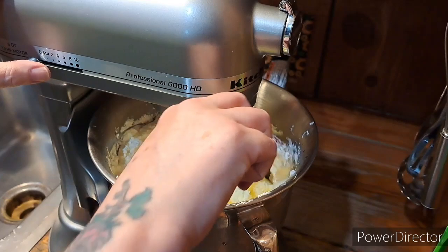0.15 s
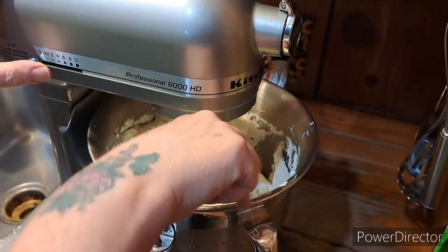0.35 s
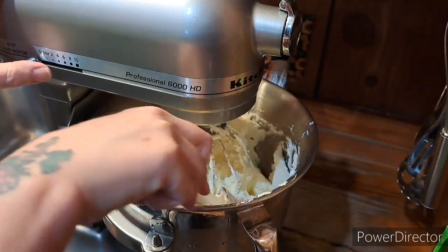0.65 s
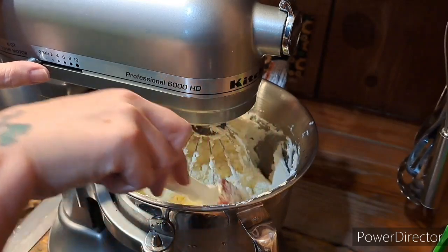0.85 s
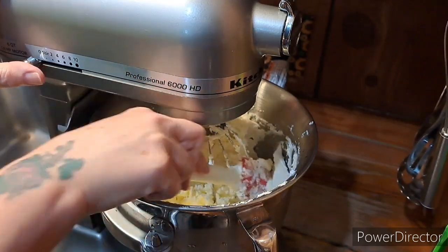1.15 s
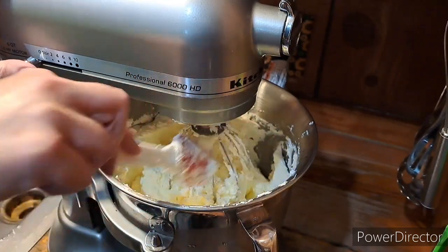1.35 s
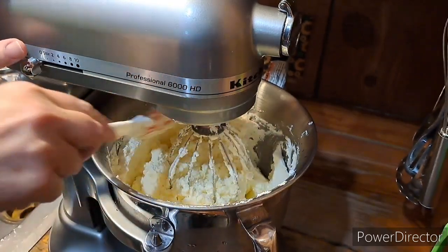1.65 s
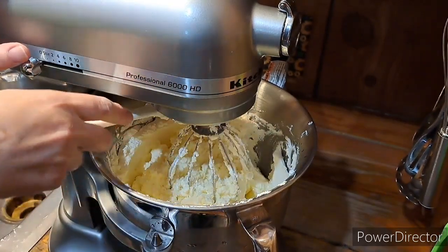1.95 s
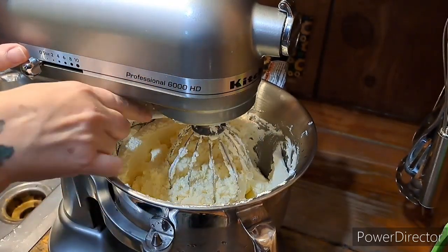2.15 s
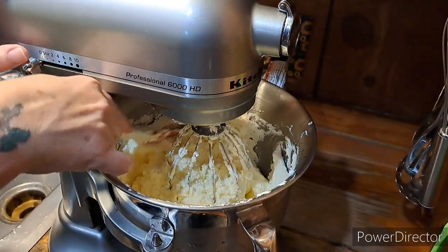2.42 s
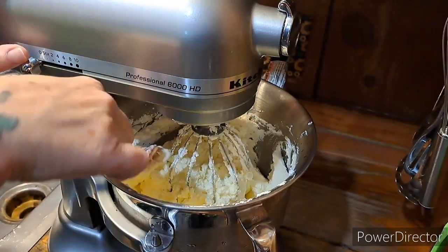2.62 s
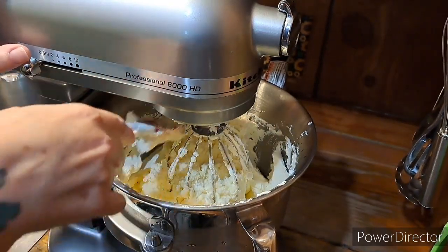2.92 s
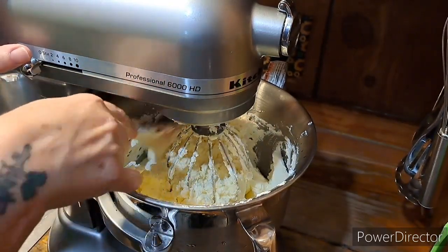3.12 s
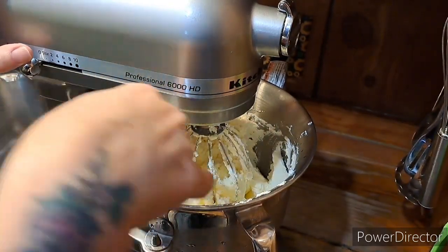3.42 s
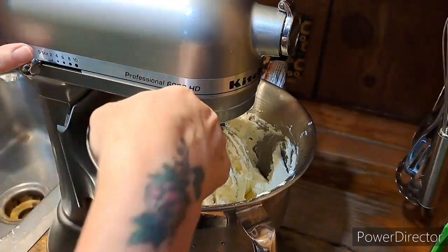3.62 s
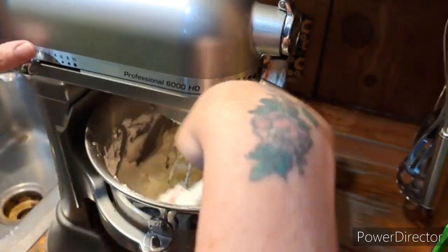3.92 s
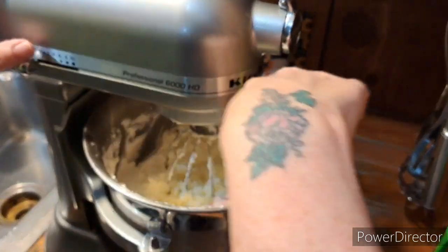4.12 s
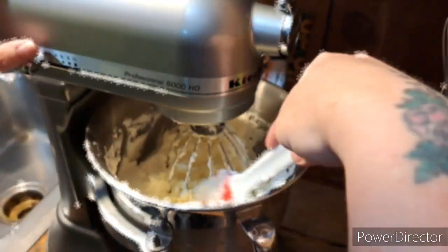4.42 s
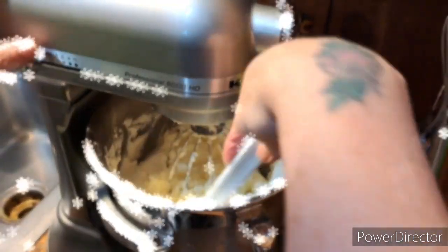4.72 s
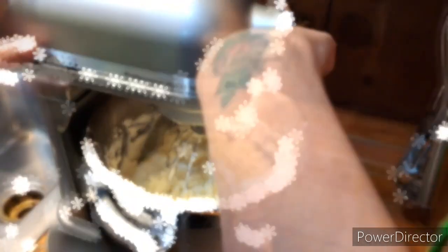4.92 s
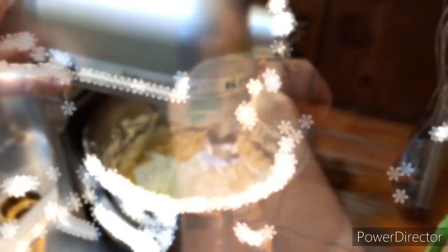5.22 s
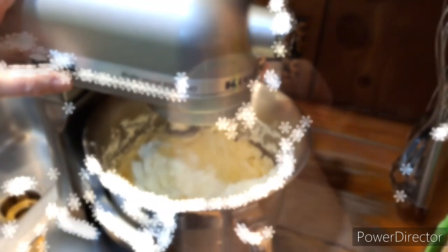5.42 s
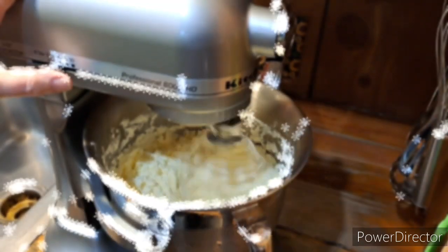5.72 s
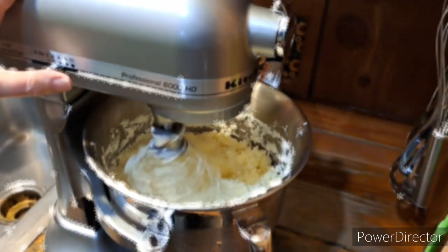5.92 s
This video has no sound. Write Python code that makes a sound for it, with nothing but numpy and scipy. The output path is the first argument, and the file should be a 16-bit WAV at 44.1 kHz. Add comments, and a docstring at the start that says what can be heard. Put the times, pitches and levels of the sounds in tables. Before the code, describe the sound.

Wet scraping and hollow metallic knocks in a mixing bowl, fading to a brief silence before a whining mixer motor rises.

```python
"""A kitchen: a soft spatula scrapes batter down a steel bowl and knocks its wall while appliances hum.
Strokes are shaped noise (wet fizz, rasp, bowl murmur) with a gliding squeak; knocks ring damped bowl
modes, and wet ticks are brief puffs of noise. The sound drops out for a moment, then air and strokes fade.
After a short silence a running stand mixer fades in: hum, drive resonances, whirr, thrum and gear whine."""
import sys
import numpy as np
from scipy import signal
from scipy.fft import rfft, irfft, next_fast_len
from scipy.io import wavfile
from scipy.ndimage import map_coordinates

SR = 44100
rng = np.random.default_rng(int(sys.argv[2]) if len(sys.argv) > 2 else 0)


def store_pcm(level_fs):
    """Save levels as 16-bit WAV."""
    pcm = np.round(np.clip(level_fs, -1, 1) * 32767).astype(np.int16)
    wavfile.write(sys.argv[1], SR, np.atleast_2d(pcm).T)


N = 267638


def amp(db):
    """Decibel law: amplitude gain of a level in dB."""
    return 10 ** (np.asarray(db) / 20)


def unit(x):
    """Normalisation: x scaled to rms 1."""
    return x / np.sqrt(np.mean(x ** 2) + 1e-20)


def along(points, hz):
    """Interpolation of (pitch, value) points on a logarithmic frequency axis."""
    f, v = np.transpose(points)
    return np.interp(np.log(hz + 1), np.log(f + 1), v)


def curves(rows):
    """Linear interpolation in time: one value per sample for each column after the time."""
    s, *cols = np.transpose(rows)
    return [np.interp(np.arange(N) / SR, s, c) for c in cols]


def wobble(rate):
    """Random modulation: a smooth curve through normal random knots, rate knots a second."""
    knots = rng.standard_normal(int(N * rate / SR) + 4)
    return map_coordinates(knots, [np.arange(N) * rate / SR])


def filtered(x, response):
    """Linear filtering: the spectrum of x times a response of frequency."""
    m = next_fast_len(N + SR // 2)
    return irfft(rfft(x, m) * response(np.fft.rfftfreq(m, 1 / SR)), m)[..., :N]


def spread(pair, gain, alike, lean):
    """Interchannel coherence: two unrelated signals coloured and mixed to a likeness and lean."""
    def mix(hz):
        turn = np.arccos(np.clip(along(alike, hz), -1, 1)) / 2
        return gain(hz) * [np.cos(turn), np.sin(turn)]

    mid, side = filtered(pair, mix)
    left_right = np.array([mid + side, mid - side]) / np.sqrt(np.mean(mid ** 2))
    return filtered(left_right, lambda hz: amp(np.outer([.5, -.5], along(lean, hz))))


def rush(spectrum, alike, lean, grain_db=0):
    """Coloured stereo noise: grain_db modulates its level into fast spits."""
    pair = rng.standard_normal((2, N)) * amp(grain_db * wobble(400))
    return spread(pair, lambda hz: amp(along(spectrum, hz)), alike, lean)


def tones(lines, lean, waver_db, drift):
    """Line spectrum: steady sines whose level (dB) and phase (radians) wander a little."""
    t, sides = np.arange(N) / SR, np.array([[.5], [-.5]])
    total = 0
    for hz, db in lines:
        gain = amp(db + waver_db * wobble(5) + sides * along(lean, hz)) * np.sqrt(2)
        total = total + gain * np.sin(2 * np.pi * hz * t + drift * wobble(2.88))
    return total


def dying(x, decays):
    """Frequency-dependent damping: each band dies at its own t60 from (pitch_hz, t60_s)."""
    hz, t, z = signal.stft(x, SR, nperseg=128)
    decay = amp(-60 * t / along(decays, hz)[:, None])
    return signal.istft(z * decay, SR, nperseg=128)[1][..., :x.shape[-1]]


# appliance tones: pitch_hz, level_db
HUM_TONES = [(58.3, -50.5), (95.5, -51.5), (143, -63.5), (214, -70.5), (285, -71.5)]
# spectrum of kitchen air and microphone hiss: pitch_hz, relative density_db
AIR_SPECTRUM = [(15, -50.5), (25, -26.5), (48, -4), (96, -3.5), (174, -13.5), (216, -14.5), (241, -20),
                (283, -13), (402, -20.5), (540, -17), (1090, -31), (1350, -32), (4080, -47.5), (12000, -50),
                (15700, -58)]
# left-right likeness of the air: pitch_hz, coherence (0-1)
AIR_COHERENCE = [(60, 0.92), (180, 0.99), (550, 0.98), (1650, 0.2), (5000, 0.21), (15000, .05)]
# stereo lean of the air and tones: pitch_hz, left minus right_db
AIR_BALANCE = [(55, -5), (100, -1.5), (180, -1), (550, 2), (1650, 0.5), (5000, -2), (15000, 2.5)]
AIR_DB, AIR_LAG_S = -51.5, 0.00035  # mean level; later arrival at the right channel


def air():
    """Tonal and broadband background: appliance tones over room noise with an interchannel delay."""
    noise = amp(AIR_DB + .6 * wobble(11)) * rush(AIR_SPECTRUM, AIR_COHERENCE, AIR_BALANCE)
    noise[1] = np.roll(noise[1], round(AIR_LAG_S * SR))
    return tones(HUM_TONES, AIR_BALANCE, waver_db=1.6, drift=0.65) + noise


# spatula strokes, the first being the blade resting in the batter:
# start_s, length_s, wet fizz_db, rasp on the steel_db, bowl murmur_db
STROKES = [(0.0, 4.9, -80, -83, -70.5), (0.0, 0.037, -77.5, -87, -82), (0.35, 0.05, -66, -74.5, -60),
           (0.395, 0.074, -64.5, -60.5, -68.5), (0.466, 0.028, -65.5, -55.5, -74),
           (0.528, 0.035, -64.5, -62.5, -72.5), (0.74, 0.017, -71, -73.5, -70),
           (0.89, 0.12, -70.5, -73, -70), (1.297, .03, -70, -75, -77), (2.369, .008, -63, -65, -65),
           (2.394, 0.016, -63, -62, -66), (2.488, 0.029, -61.5, -61, -59), (2.536, .05, -64.5, -57.5, -63),
           (2.6, 0.081, -62.5, -54.5, -64.5), (2.712, 0.023, -64, -65, -68), (2.758, .08, -62.5, -65, -70),
           (2.927, .03, -69.5, -73.5, -69), (3.207, 0.055, -70, -67.5, -63.5),
           (3.26, 0.035, -64, -62.5, -66), (3.326, 0.044, -65, -53.5, -68), (3.413, 0.061, -65, -62, -65.5),
           (3.702, .04, -72, -72, -61), (3.743, 0.061, -65, -68, -59.5), (3.833, 0.33, -66.5, -67.5, -64),
           (4.158, 0.22, -67.5, -70, -63), (4.358, 0.025, -61, -62, -61), (4.42, .13, -68, -74.5, -71),
           (4.822, 0.063, -61, -59, -58), (4.958, .07, -61.5, -63, -61), (5.061, .15, -71, -75.5, -69)]
ATTACK_S, RELEASE_DB_PER_S = .012, 169.5


def contact():
    """Envelopes with power addition: strokes rise, hold and trail off; gives fizz, rasp, murmur in dB."""
    t, power = np.arange(N) / SR, np.full((3, N), 1e-14)
    for start, length, *levels in STROKES:
        attack = np.clip((t - start) / ATTACK_S, 0, 1)
        release = amp(-RELEASE_DB_PER_S * np.clip(t - start - length, 0, 1))
        power = power + np.outer(amp(levels), attack * release) ** 2
    return 10 * np.log10(power) + 1.5 * np.array([wobble(18) for _ in power])


# modes of the steel bowl: pitch_hz, level_db, free t60_s
BOWL_MODES = [(171.7, 4, .12), (214, -2, 0.12), (442.2, 3.5, 0.078), (474.5, 1, 0.092), (661, -9.5, 0.099),
              (817, -12.5, 0.026), (1037, 2, 0.097), (1251, -2, 0.11), (1472, -2.5, 0.12),
              (1776, -2.5, 0.11), (2210, -5, .035), (2550, -6, 0.081), (3030, -5.5, 0.026),
              (3710, -6.5, 0.095), (4457, -1, 0.09), (4840, -4, 0.079), (5270, -8, .03), (7000, -8.5, .04)]


def sing(hz):
    """Modal resonance: how strongly the bowl answers rubbing; a shorter decay gives a wider peak."""
    answer = 0
    for mode_hz, db, t60 in BOWL_MODES:
        width_hz = np.log(1000) / np.pi / t60
        answer = answer + amp(db) / (1 + (2 * (hz - mode_hz) / width_hz) ** 2)
    return answer


# wet batter under the blade: pitch_hz, relative density_db
FIZZ_SPECTRUM = [(2350, -35.5), (4000, -7), (5030, -2), (6110, -5), (7550, 3.5), (8560, -5), (10200, -5),
                 (14500, 0), (15200, -1), (15700, -24)]
# blade edge on steel, before the bowl's resonance: pitch_hz, relative density_db
RASP_SPECTRUM = [(710, -33), (1200, -5), (1740, -2), (2080, -3.5), (2290, -4), (3540, -3.5), (4500, -2),
                 (5520, -6), (7010, -6), (8680, -18), (10000, -21), (13000, -46.5), (22000, -120)]
# bowl murmur, before the bowl's resonance: pitch_hz, relative density_db
MURMUR_SPECTRUM = [(150, -30), (250, 2.5), (354, -9), (441, 2), (715, -11), (1030, -18.5), (1130, -11),
                   (2500, -21.5), (3250, -48.5), (5500, -120)]
# left-right likeness of the strokes: pitch_hz, coherence (0-1)
STROKE_COHERENCE = [(200, 1), (500, 0.74), (1000, 0.68), (3000, 0.19), (8000, 0.1)]
# hollow, gliding rub as the blade bends along the wall: time_s, pitch_hz, level_db
SQUEAK_GLIDE = [(3.1, 1200, -91.5), (3.19, 1440, -67), (3.3, 1500, -71.5), (3.44, 1330, -66.5),
                (3.56, 1244, -61.5), (3.67, 1217, -62), (3.77, 1650, -59), (3.84, 1700, -95)]


def strokes():
    """Friction noise: wet batter fizzes, the edge rasps, the bowl's modes colour rasp and murmur."""
    fizz_db, rasp_db, murmur_db = contact()
    flutter = 1.6 * wobble(60)
    # leans are (pitch_hz, left minus right_db)
    fizz = rush(FIZZ_SPECTRUM, STROKE_COHERENCE, [(3000, -5.5), (12000, 1.5)], grain_db=1.5)
    rasp = rush(RASP_SPECTRUM, STROKE_COHERENCE, [(2000, 2.5), (8000, -7.0)], grain_db=3.5)
    murmur = rush(MURMUR_SPECTRUM, STROKE_COHERENCE, [(500, 0.6), (2000, -4.5)], grain_db=1.5)
    fizz = amp(fizz_db + flutter) * fizz
    rubbing = np.array([amp(rasp_db + flutter) * rasp, amp(murmur_db + flutter) * murmur])
    rasp, murmur = filtered(rubbing, lambda hz: 0.68 + 0.86 * sing(hz))
    squeak_hz, squeak_db = curves(SQUEAK_GLIDE)
    roughness = np.array([wobble(170), wobble(170)])
    squeak = amp(squeak_db) * roughness * np.sin(2 * np.pi * np.cumsum(squeak_hz) / SR)
    return fizz + rasp + murmur + squeak


# knocks on the bowl: start_s, level_db, hardness (0-1), base thud_db, wall ring_db, left minus right_db
KNOCKS = [(0.234, -39.5, .2, -2, -18, 0.5), (0.406, -30, .4, -21.5, -28.5, 1),
          (0.421, -37.5, 0.73, -12, -21, -5), (0.437, -29.5, 0.75, -16, -33, -0.5),
          (0.447, -18, 0.98, -21.5, -19.5, -1.5), (0.563, -38.5, 0.5, -25, -25, 1),
          (0.894, -33.5, 0.44, -23, -26.5, -0.5), (1.185, -31, 0.05, -10.5, -25, 1),
          (2.153, -40.5, 0.1, -1, -27, -1.5), (2.386, -35, 0.23, -13.5, -26.5, 0),
          (2.398, -33, 0.62, -14.5, -34, -3.0), (2.557, -36.5, 0.97, -14, -20, -2.5),
          (2.601, -34, 0.97, -21, -14, -1), (2.6125, -22.5, 0.82, -22, -13, -1),
          (2.666, -34, 0.87, -19, -21, -1), (2.933, -47, .5, -13.5, -24, 5),
          (3.127, -40.5, 0, -20, -18.5, 3), (3.213, -47, 0.4, -18, -21, -1.5),
          (3.324, -20, 0.99, -19.5, -12.5, 0.5), (3.365, -39, 0.97, -6.5, -14.5, -2),
          (3.377, -40.5, 1.0, -13, -8, -3), (3.676, -26, 0.11, -12.5, -22.5, 2),
          (3.697, -50, .4, -12, -17, -1), (4.097, -39, .4, -7, -28, 3.5),
          (4.308, -38, 0.2, -6.5, -18.5, 0.5), (4.754, -51.5, 0.56, 4, -26, 0),
          (4.845, -53.5, 0.8, -14, -13, 4)]
# force spectrum of a blow: pitch_hz, softest_db, hardest_db
BLOW_SPECTRUM = [(446, -4, -15), (1985, -38.5, -20.5), (4500, -54, -17), (7500, -63, -25.5),
                 (10000, -81, -50)]
# decay of the dense upper modes: pitch_hz, t60_s
CLACK_DECAY = [(300, 0.1), (1000, 0.056), (4000, 0.034), (10000, 0.028)]
THUD_HZ, WALL_HZ, THUD_FALL_DB = 170, 1062, 22.5  # the fall is from the thud down to 60 Hz
SCATTER_DB, SCATTER_PITCH = 3, .01  # blow to blow: mode level, share of mode pitch
DAMPED = (0.73, 0.87)  # share of free t60 that hand and batter allow: softest, hardest blow
CONTACT_S = (.0016, 0.00056)  # time constant of the blade landing: softest, hardest blow


def knocks():
    """Modal impact: each blow rings damped bowl modes; harder contact reaches the higher ones."""
    out, t = np.zeros((2, N + SR)), np.arange(SR // 4) / SR
    hz, level, t60 = np.transpose(BOWL_MODES)[:, :, None]
    bins = np.fft.rfftfreq(len(t), 1 / SR)
    rise = 1 - np.exp(-t * hz / 1.04)  # about a cycle
    chance = rng.standard_normal((len(KNOCKS), len(BOWL_MODES), 3))
    for (start, db, hard, thud_db, wall_db, pan), luck in zip(KNOCKS, chance):
        force = [(60, thud_db - THUD_FALL_DB), (THUD_HZ, thud_db), (WALL_HZ, wall_db)]
        force += [(f, soft + hard * (firm - soft)) for f, soft, firm in BLOW_SPECTRUM]
        force.sort()
        damped_t60 = t60 * np.interp(hard, (0, 1), DAMPED)
        landing = 1 - np.exp(-t / np.interp(hard, (0, 1), CONTACT_S))
        gain = amp(along(force, hz) + level + SCATTER_DB * luck[:, :1] - 60 * t / damped_t60)
        phase = 2 * np.pi * hz * (1 + SCATTER_PITCH * luck[:, 1:2]) * t
        # noise common to both channels, and noise that sets them apart in the treble
        colour = amp(along(force, bins)) * np.array([bins > 0, bins / (bins + 700)])
        shared, own = irfft(rfft(rng.standard_normal((2, len(t)))) * colour, len(t))
        for channel, side in enumerate((.5, -.5)):
            # upper modes reach the two channels out of step
            lag = luck[:, 2:] * side * np.minimum(hz / 1500, 1.5)
            ring = np.sum(gain * rise * np.sin(phase + lag), axis=0)
            clack = amp(13.0) * dying(shared + 2.0 * side * own, CLACK_DECAY) * landing
            out[channel, round(start * SR):][:len(t)] += amp(db + pan * side) * (ring + clack)
    return out[:, :N]


# batter letting go: start_s, relative level_db, pitch_hz, left minus right_db
BATTER_TICKS = [(0.359, -42, 7650, -7), (0.4027, -45, 5800, -13.5), (0.741, -53, 7610, -6),
                (0.7544, -47, 7360, -7), (0.8939, -55, 7640, -12), (0.9098, -55, 7270, -15),
                (0.943, -57, 7500, 1), (0.961, -51, 6800, -6), (1.0296, -54, 7900, -6.5),
                (1.3096, -45.5, 7310, -1), (2.379, -50, 4370, -3.5), (2.401, -38.5, 4460, -4),
                (2.4743, -53, 4510, 0.5), (2.5114, -45, 4380, -11.5), (2.54, -43, 4430, -11),
                (2.5593, -45, 7830, -8), (2.6664, -48, 4950, -11.5), (2.7283, -46, 7350, -13.5),
                (2.764, -44, 7200, -5), (2.8265, -39, 14000, 2), (2.8723, -45, 7700, -3),
                (3.0365, -58, 7600, -3.5), (3.277, -42.5, 7300, -4), (3.441, -47.5, 4340, -7),
                (3.7306, -54, 7850, -2), (3.7694, -57.5, 7420, 6), (3.841, -47.5, 5100, -9),
                (3.9074, -53, 5190, -1.5), (3.9848, -58, 7710, 9), (4.0133, -52.5, 5230, -2.5),
                (4.0768, -47.5, 5160, 2), (4.133, -53, 6610, 1.5), (4.372, -48.5, 7300, -4),
                (4.827, -61, 6930, 4.5), (4.847, -47, 5340, 6), (4.9903, -59, 7530, -6)]


def ticks():
    """Band-limited transients: short wet clicks, puffs of noise gathered around a pitch."""
    out, t = np.zeros((2, N + SR)), np.arange(SR // 40) / SR
    bins = np.fft.rfftfreq(len(t), 1 / SR)
    decay = amp(-60 * t / 0.007) + 0.18 * amp(-60 * t / 0.043)  # t60s of 7 and 43 ms
    for start, db, hz, pan in BATTER_TICKS:
        colour = 0.18 * (bins / (bins + 3000)) + 1 / (1 + ((bins - hz) / 900) ** 2)
        noise = irfft(rfft(rng.standard_normal((2, len(t)))) * colour, len(t))
        gain = amp(db - 5.5 + pan * np.array([[.5], [-.5]]))
        out[:, round(start * SR):][:, :len(t)] += gain * unit(noise) * decay
    return out[:, :N]


# reverberation of the kitchen: pitch_hz, t60_s
KITCHEN_DECAY = [(200, 0.12), (1500, 0.32), (6000, 0.22), (14000, 0.19)]


def room(x):
    """Reverberation: convolution with a decaying noise tail after a short delay."""
    tail = dying(rng.standard_normal((2, SR // 2)), KITCHEN_DECAY)
    delayed = np.pad(x, ((0, 0), (300, 0)))  # samples
    return signal.fftconvolve(delayed, tail / np.linalg.norm(tail[0]), axes=1)[:, :N]


# magnetic hum of the motor: pitch_hz, level_db before modulation and fade
MOTOR_HUM = [(60, -67.5), (240, -56), (360, -48.5), (480, -59.5)]
# resonances shaken by the drive: pitch_hz, width_hz, level_db before the fade
DRIVE_RESONANCES = [(273.5, 15, -59.5), (427, 17, -60), (750.5, 19, -61), (980, 30, -65), (1031, 65, -52),
                    (1103, 19, -77), (1274, 17, -58.5), (1400, 39, -65), (1647, 84, -56.5), (2070, 18, -64),
                    (2452, 73, -55), (4940, 480, -56.5), (7280, 1140, -54)]
# brushes, fan and gears: pitch_hz, relative density_db
WHIRR_SPECTRUM = [(24, -48), (40, -22), (117, -13.5), (166, -11.5), (303, -15), (361, -9.5), (409, -11.5),
                  (844, -18), (1000, -8.5), (2240, -14.5), (2470, -29), (2660, -18.5), (7420, -22.5),
                  (13500, -24.5), (15700, -34)]
# left-right likeness of whirr and resonances: pitch_hz, coherence (0-1)
WHIRR_COHERENCE = [(60, 0.91), (180, 1), (550, 0.69), (1650, 0.064), (4970, 0.024), (15000, 0.0092)]
# stereo lean of whirr, resonances and hum: pitch_hz, left minus right_db
WHIRR_BALANCE = [(60, -3), (180, 2.5), (550, -1), (1650, -2), (4970, -2.5), (15000, 1)]
# wavering housing thrum: time_s, level_db before the fade
THRUM_LEVEL = [(5.26, -44.5), (5.352, -72), (5.42, -42.5), (5.49, -49), (5.526, -40), (5.578, -46),
               (5.606, -61), (5.7, -44), (5.745, -55), (5.94, -39), (5.99, -42.5), (6.069, -58)]
WHIRR_DB = -44
THRUM_HZ, MESH_HZ = 171, 1226
SWELL_HZ, SWELL_PEAK_S = 5.13, 5.45  # the whine swells as the whisk goes round
MESH_DB, OCTAVE_DB = (-51, 2.5), (-47, 6.5)  # (mean dB, swell depth dB)
MESH_LAG = 0.23  # the lower tone swells after its octave (share of a round)


def mixer(fade):
    """Machine noise: hum, broad resonances and whirr, with a thrum and amplitude-modulated gear whine."""
    t = np.arange(N) / SR
    thrum_db, = curves(THRUM_LEVEL)
    turn = 2 * np.pi * SWELL_HZ * (t - SWELL_PEAK_S)
    mesh_db = MESH_DB[0] + MESH_DB[1] * np.cos(turn - 2 * np.pi * MESH_LAG) + 3 * wobble(15)
    octave_db = OCTAVE_DB[0] + OCTAVE_DB[1] * np.cos(turn) + 0.94 * wobble(40)
    whirr = rush(WHIRR_SPECTRUM, WHIRR_COHERENCE, WHIRR_BALANCE, grain_db=1.5)
    whirr = amp(WHIRR_DB + 0.74 * wobble(40)) * whirr
    hum = tones(MOTOR_HUM, WHIRR_BALANCE, waver_db=3.0, drift=1.0) * (1 + 0.4 * wobble(30))
    drive = np.zeros((2, N))
    for hz, width, db in DRIVE_RESONANCES:
        peak = lambda f: 1 / (1 + ((f - hz) / width * 2) ** 2)
        drive += amp(db) * spread(rng.standard_normal((2, N)), peak, WHIRR_COHERENCE, WHIRR_BALANCE)
    thrum_phase = 2 * np.pi * THRUM_HZ * t + 0.64 * wobble(15) + 0.22 * wobble(50)
    thrum = amp(thrum_db) * np.sqrt(2) * np.sin(thrum_phase)
    teeth = 2 * np.pi * MESH_HZ * t + .5 * wobble(20) + 0.29 * wobble(90)  # slightly uneven tooth contact
    apart = np.array([[.6], [-.6]])  # the whine reaches the channels out of step (radians)
    whine = amp(mesh_db) * np.sin(teeth + apart) + amp(octave_db) * np.sin(2 * teeth + 1.1 * apart)
    return fade * (hum + drive + whirr + thrum + whine)


DROP_FROM_S, DROP_TO_S = 3.2265, 3.2500
FADE_OUT_S = (3.25, 5.23)  # linear fade of air and strokes: from, to
# the mixer's linear fade: zero, first heard, unity gain (it keeps rising after that)
MIXER_ZERO_S, MIXER_START_S, MIXER_UNITY_S = 5.235, 5.256, 5.977


def scene():
    """Superposition: kitchen layers add, drop out briefly and fade; then the mixer fades in."""
    t = np.arange(N) / SR
    hits = knocks() + ticks()  # these keep their own levels through the fade
    fade_out = np.interp(t, FADE_OUT_S, (1, 0))
    kitchen = fade_out * (air() + strokes()) + hits + amp(-9) * room(hits)
    kitchen = kitchen * ((t < DROP_FROM_S) | (t > DROP_TO_S))
    fade_in = (t - MIXER_ZERO_S) / (MIXER_UNITY_S - MIXER_ZERO_S)
    return kitchen + mixer(fade_in) * (t > MIXER_START_S)


TOP_HZ = 15600


def record(dry):
    """Band limiting: the camera keeps nothing from its band limit up."""
    return filtered(dry, lambda hz: hz < TOP_HZ)


dry = scene()
out = record(dry)
store_pcm(out)
```